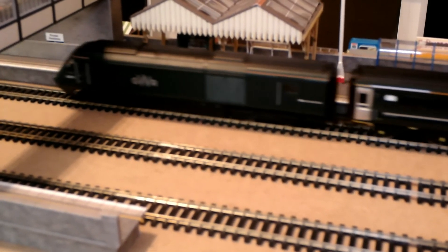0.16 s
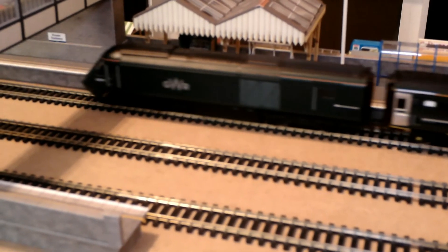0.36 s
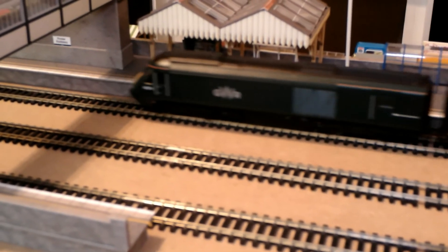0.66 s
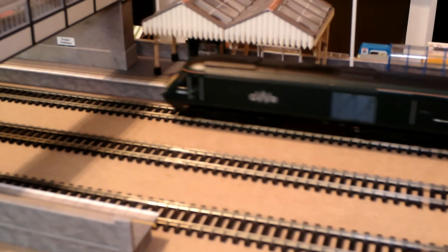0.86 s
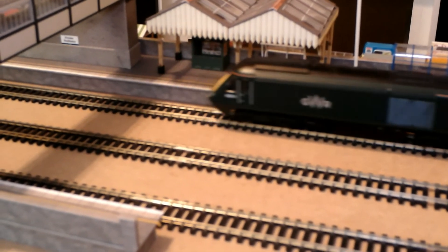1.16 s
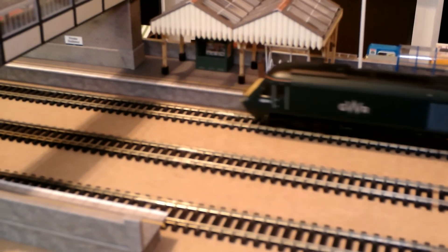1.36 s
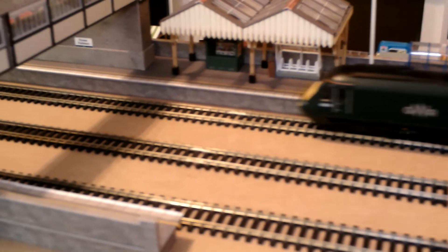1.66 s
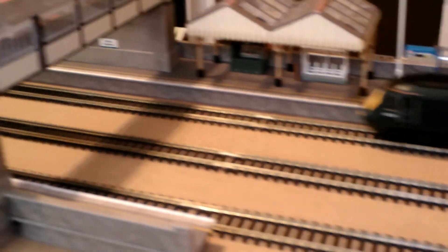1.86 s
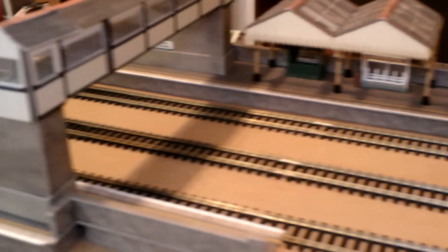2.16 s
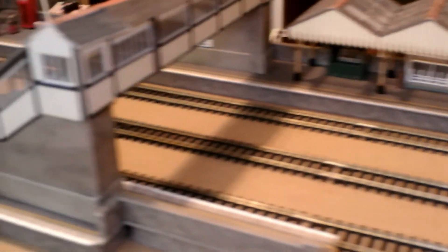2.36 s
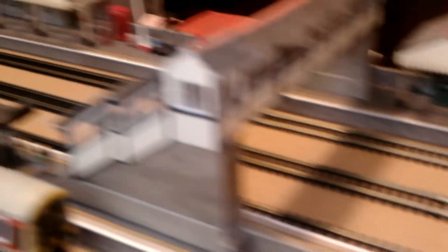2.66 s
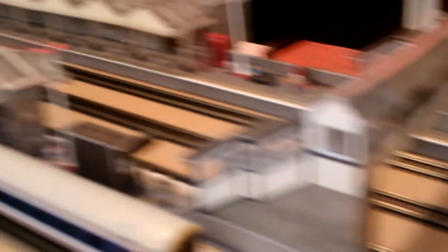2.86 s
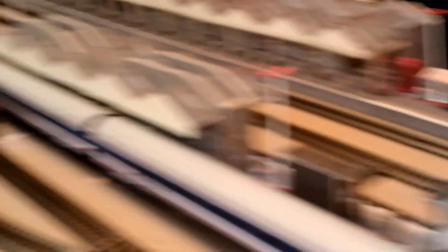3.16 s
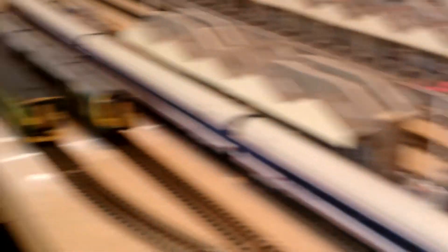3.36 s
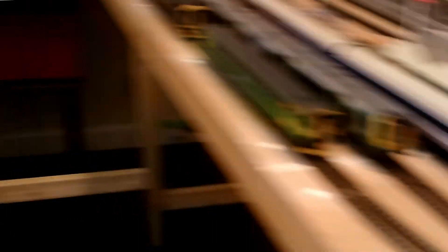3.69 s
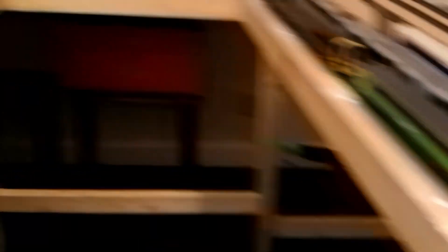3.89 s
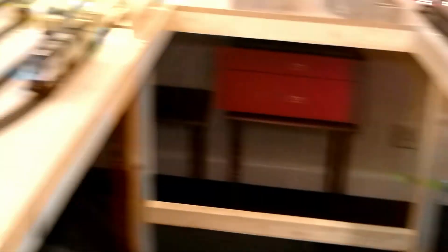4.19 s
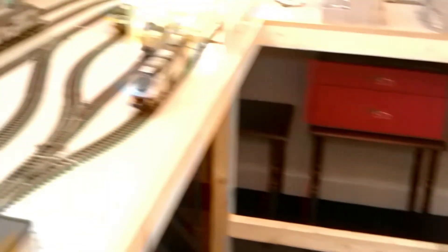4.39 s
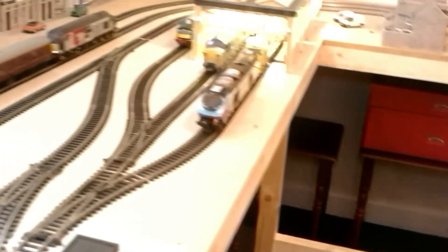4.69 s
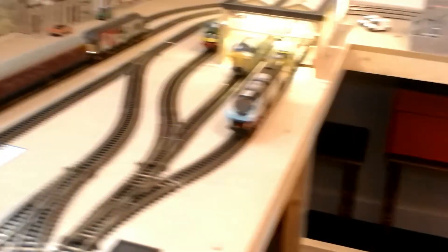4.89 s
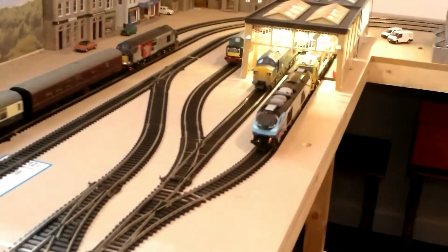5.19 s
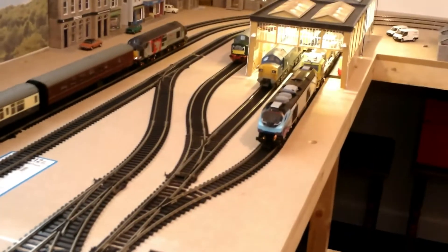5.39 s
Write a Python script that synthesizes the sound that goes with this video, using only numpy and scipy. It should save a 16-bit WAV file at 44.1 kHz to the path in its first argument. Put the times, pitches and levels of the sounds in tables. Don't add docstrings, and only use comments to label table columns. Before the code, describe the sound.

Steady rolling noise of small trains on rails, nasal and rattly with little bass, its tone shifting as vehicles pass. Small clicks tick unevenly for the first three seconds; then a fast chattering drive noise approaches and becomes a rough, pulsing clatter close to the microphone. There is thin hiss and faint whine above, soft baseboard hum below and short reflections from near walls. Mono handheld phone pickup, slightly lossy.

```python
import sys
import numpy as np
from scipy import signal
from scipy.fft import rfft, irfft, next_fast_len
from scipy.io import wavfile
from scipy.ndimage import uniform_filter1d

SR = 44100
rng = np.random.default_rng(int(sys.argv[2]) if len(sys.argv) > 2 else 0)


def field_ratio(decibels):
    return 10 ** (np.asarray(decibels, dtype=float) / 20)


def transcribe(signal):
    frames = np.atleast_2d(signal).T
    limited = np.clip(frames, -1, 1)
    pcm = np.round(limited * 32767).astype(np.int16)
    wavfile.write(sys.argv[1], SR, pcm)


N = 244439

# (time [s], lower ring level [dB], lower ring pitch [Hz], upper ring level [dB], upper ring pitch [Hz])
KNOCKS_APPROACHING = [(3.3125, -44.0, 1750, -28.0, 2260), (3.3651, -25.0, 1450, -29.0, 1840),
                      (3.4068, -31.5, 1750, -27.0, 2870), (3.4505, -32.0, 1750, -30.5, 1800),
                      (3.485, -27.5, 1750, -21.5, 2270), (3.5248, -35.0, 1150, -26.5, 2060),
                      (3.5628, -23.5, 1550, -31.0, 1890), (3.602, -31.0, 1750, -21.5, 1930),
                      (3.6351, -28.0, 1200, -22.5, 2210), (3.6798, -29.5, 1750, -22.5, 1910),
                      (3.7082, -30.5, 1750, -20.0, 2210), (3.7525, -27.0, 1750, -15.5, 2380),
                      (3.7882, -26.0, 1510, -24.5, 2410), (3.8216, -40.0, 1750, -29.0, 1850),
                      (3.8627, -24.5, 1750, -23.5, 1810), (3.8993, -33.0, 1750, -23.5, 1850),
                      (3.9343, -34.5, 1150, -23.0, 2570), (3.9718, -33.0, 1750, -21.5, 1880),
                      (4.0013, -29.0, 1160, -29.0, 1910), (4.0446, -35.5, 1750, -23.0, 2500),
                      (4.0799, -19.5, 1350, -20.5, 2240), (4.0871, -20.5, 1430, -19.0, 2230),
                      (4.0987, -23.5, 1190, -21.0, 1880), (4.1292, -33.0, 1750, -18.5, 2510),
                      (4.1559, -24.5, 1420, -16.0, 2610), (4.2011, -29.0, 1310, -27.5, 2330),
                      (4.2327, -21.5, 1370, -26.5, 2450), (4.2749, -26.0, 1340, -24.0, 1880),
                      (4.2825, -29.0, 1750, -19.5, 2240), (4.3074, -16.0, 1490, -28.0, 1860),
                      (4.3497, -27.5, 1280, -29.5, 2590), (4.3814, -18.5, 1350, -28.0, 2430),
                      (4.3949, -32.0, 1330, -20.5, 2170), (4.4241, -36.5, 1430, -23.0, 2430),
                      (4.4601, -18.0, 1430, -29.5, 2340), (4.4996, -27.0, 1430, -28.0, 2170)]
# (time [s], lower ring level [dB], lower ring pitch [Hz], upper ring level [dB], upper ring pitch [Hz])
KNOCKS_CLOSE = [(4.5377, -23.0, 1310, -25.5, 2170), (4.5806, -26.0, 1500, -26.5, 2060),
                (4.6126, -18.5, 1420, -38.5, 2130), (4.6596, -26.5, 1440, -26.0, 2360),
                (4.6938, -24.0, 1460, -27.0, 2190), (4.7318, -25.5, 1420, -27.0, 2690),
                (4.7687, -16.0, 1400, -28.0, 2700), (4.7784, -19.5, 1390, -20.5, 2180),
                (4.8099, -20.0, 1500, -33.5, 1860), (4.8438, -10.5, 1530, -16.5, 2690),
                (4.8902, -15.0, 1420, -16.5, 2690), (4.9241, -18.0, 1530, -24.0, 2630),
                (4.9691, -21.0, 1640, -19.5, 1920), (5.0013, -8.0, 1550, -16.5, 2860),
                (5.0081, -17.0, 1480, -20.0, 2190), (5.0454, -12.0, 1470, -27.0, 2030),
                (5.0599, -19.0, 1440, -31.5, 2090), (5.0818, -34.5, 1350, -19.5, 2710),
                (5.1216, -21.0, 1410, -20.5, 2700), (5.1321, -23.5, 1360, -16.0, 2680),
                (5.1602, -21.5, 1430, -18.5, 2270), (5.1689, -21.0, 1510, -19.5, 2660),
                (5.1979, -18.5, 1440, -20.5, 2300), (5.2126, -20.5, 1480, -19.0, 2460),
                (5.2312, -13.0, 1610, -21.0, 2240), (5.2374, -17.0, 1550, -21.0, 1800),
                (5.2604, -25.0, 1740, -24.0, 2100), (5.2786, -35.0, 1150, -24.5, 2470),
                (5.3125, -17.0, 1500, -17.0, 2140), (5.3246, -19.0, 1440, -23.5, 2100),
                (5.357, -19.0, 1480, -20.0, 2440), (5.3666, -24.0, 1490, -19.0, 2460),
                (5.3888, -7.5, 1510, -30.0, 2370), (5.4293, -20.5, 1490, -29.5, 1800),
                (5.4662, -15.0, 1480, -23.5, 2280), (5.5094, -19.0, 1560, -24.5, 2500),
                (5.5193, -20.5, 1730, -20.5, 1800), (5.5385, -23.0, 1540, -19.0, 2410)]
RING_LEAD_S = 0.0042


def rms_one(x):
    return x / np.sqrt(np.mean(x ** 2) + 1e-20)


def in_time(rows):
    s, *columns = np.transpose(rows)
    return [np.interp(np.arange(N) / SR, s, c) for c in columns]


def swells(rows):
    t = np.arange(N) / SR
    return sum(db * np.exp(-((t - s) / half_s) ** 2) for s, half_s, db in rows)


def drift(rate):
    r = np.exp(-80 * np.pi * rate / SR)
    slow = signal.lfilter([1], [1, -2 * r, r * r], rng.standard_normal(N // 40 + 2002))[2000:]
    return np.interp(np.arange(N) / 40, np.arange(len(slow)), rms_one(slow))


def shaped(x, gain_at):
    size = next_fast_len(N)
    hz = np.arange(1, size // 2 + 2) * SR / size
    return irfft(rfft(x, size) * gain_at(hz), size)[:N]


def coloured(points):
    hz, db = np.transpose(points)
    return rms_one(shaped(rng.standard_normal(N), lambda f: field_ratio(np.interp(np.log(f), np.log(hz), db))))


def steep(x, low_hz, high_hz):
    return signal.sosfilt(signal.butter(4, [low_hz, high_hz], "band", fs=SR, output="sos"), x)


def rush():
    # (time [s], rush level [dB], brightness as it turns toward the microphone [dB])
    train_run = [(0.0, -33, 3), (0.2, -31.5, 0.5), (0.75, -28.5, 1), (1.36, -29.5, -2.5), (2.13, -30.5, 2),
                 (2.33, -33.5, 4.5), (2.95, -30, -3), (3.78, -30.5, 0.5), (4.03, -35, 3), (4.09, -35, -2.5),
                 (4.2, -29, -3.5), (4.43, -29.5, 2), (4.61, -30.5, -3), (4.86, -27.5, 2), (4.94, -27, -1),
                 (5.15, -29, 2.5), (5.51, -30, 2), (5.54, -27, 0)]
    # (time [s], level [dB])
    far_train = [(0.0, -33), (0.48, -35), (0.52, -31.5), (0.63, -33), (2.79, -38), (2.85, -35.5),
                 (3.16, -36.5), (3.26, -34), (3.35, -39.5), (3.38, -33.5), (3.7, -34), (4.1, -33),
                 (4.2, -36), (4.4, -30), (4.41, -31.5), (5.25, -33), (5.48, -34), (5.54, -31.5)]
    # (time [s], half length [s], level [dB])
    bogie_surges = [(.40, 0.044, 4), (.55, 0.08, 3.5), (.92, 0.059, -1), (1.17, 0.035, 2.5),
                    (1.36, 0.036, 0), (1.46, 0.037, 1.5), (1.68, 0.054, -1), (2.01, 0.019, 3),
                    (2.09, 0.032, -2.5), (2.22, 0.027, 1), (2.5, 0.069, -0.5), (2.6, 0.015, 2),
                    (2.7, 0.015, -2), (2.87, 0.011, -1), (3.0, 0.037, -1.5), (3.06, 0.026, 2.5),
                    (3.13, 0.021, -2.5), (3.27, 0.023, 3.5), (3.76, 0.021, 1), (4.07, 0.09, 5.5),
                    (4.21, 0.024, -0.5), (4.71, 0.016, -8), (4.95, 0.004, 0.5), (5.32, 0.017, -1),
                    (5.365, 0.0094, 2), (5.49, 0.01, 1.5)]
    # (time [s], half length [s], panel boost [dB])
    coach_passes = [
        (0.5, 0.24, 5),
        (1.2, 0.1, 5),
        (1.898, 0.11, 7.5),
        (2.8, 0.039, 9),
        (3.12, 0.16, 6.5),
    ]
    # (pitch [Hz], width [Hz], level [dB])
    body_low = [(747, 54, -5), (885.4, 36, -2.5), (968.4, 42, -2.5), (1081, 97, -1), (1117, 63, 0.5),
                (1218, 130, -4.5)]
    # (pitch [Hz], width [Hz], level [dB])
    body_mid = [(1328, 63, -4.5), (1388, 40, 1), (1481, 19, -1), (1546, 17, -4.5), (1606, 18, -2.5),
                (1708, 38, -1), (1763, 41, -0.5), (1862, 33, 1), (1965, 59, -1), (2000, 33, -3),
                (2047, 23, -1)]
    # (pitch [Hz], width [Hz], level [dB])
    body_top = [(2210, 43, 2.5), (2241, 61, -3), (2280, 25, 2), (2373, 36, -1.5), (2437, 30, 2),
                (2578, 43, -1), (2694, 48, -2), (2745, 54, -7.5), (2813, 46, -10)]
    # (pitch [Hz], width [Hz], level [dB])
    body_edge = [(3000, 290, -0.5), (3130, 220, -0.5), (3326, 370, 3.5), (3426, 180, 1.5),
                 (3470, 130, -5.5)]

    mid_db, bright_db = in_time(train_run)
    far_db, = in_time(far_train)
    ticks = rolling(5000, spread_db=2.0) * field_ratio(0.63 * drift(11))
    far_ticks = rolling(5000, spread_db=0.5)
    shake_db = throb() + swells(bogie_surges)
    low_db = far_db + 0.4 + 0.4 * shake_db
    top_db = mid_db - 2.5 + bright_db + shake_db
    edge_db = mid_db - 16 + bright_db + swells(coach_passes) + shake_db
    low = field_ratio(low_db) * rms_one(resonate(far_ticks, body_low, patchy_db=1.27, rate=5.0))
    mid = field_ratio(mid_db - 1.03 + shake_db) * rms_one(resonate(ticks, body_mid, patchy_db=1.5, rate=7.3))
    top = field_ratio(top_db) * rms_one(resonate(ticks, body_top, patchy_db=1.5, rate=2.8))
    panels = steep(resonate(ticks, body_edge, patchy_db=0.7, rate=1.9), 2796, 3800)
    return steep(mid - low - top, 640, 3110) - field_ratio(edge_db) * rms_one(panels)


def rolling(per_s, spread_db):
    sizes = field_ratio(spread_db * np.minimum(rng.exponential(1, N), 5)) * rng.choice([-1, 1], N)
    return sizes * (rng.random(N) < per_s / SR) + 1e-18


def resonate(x, modes, patchy_db, rate):
    wander, wander_per_s = 0.003, 1.0
    out = 0
    for k, (hz, width, db) in enumerate(modes):
        turn = np.exp(2j * np.pi * np.cumsum(hz * (1 + wander * drift(wander_per_s))) / SR)
        ring = (turn * signal.lfilter([1], [1, -np.exp(-np.pi * width / SR)], x / turn)).real
        level_db = db + passing(hz) + patchy_db * drift(rate)
        out = out + (-1) ** k * field_ratio(level_db) * rms_one(ring)
    return out


def passing(hz):
    # (time [s], cancelled pitch [Hz], depth [dB])
    board_echo = [(1.0, 1122, 2.5), (1.3, 1146, -0.5), (1.75, 1240, 10), (2.2, 1434, -4), (2.45, 1596, 0.5),
                  (3.3, 1347, 9.5), (3.6, 1320, 0.5), (4.05, 1685, 13.5), (4.7, 1735, 3), (5.4, 1917, 13),
                  (5.54, 1840, 8.5)]
    # (time [s], half
    # length [s], shell pitch [Hz], level [dB])
    singing_shells = [(.43, 0.38, 1940, 3.5), (.48, 0.58, 2257, -1.5), (0.744, 0.16, 2340, -3),
                      (0.11, 0.36, 1294, 5.5), (1.065, 0.22, 1464, 8), (2.215, 0.045, 2204, 7),
                      (2.242, 0.14, 2430, 0), (3.307, 0.28, 1417, 4.5), (1.225, 0.13, 2636, 12.5),
                      (1.274, 0.58, 1800, 6.5), (1.535, 0.31, 2260, 9), (1.854, 0.26, 1915, 5),
                      (1.88, 0.6, 886, 2.5), (2.103, 0.18, 2694, 8), (2.257, 0.32, 1736, 9),
                      (2.692, 0.42, 2367, -1), (2.733, 0.25, 1430, 8.5), (2.953, 0.25, 1098, 6.5),
                      (3.306, 0.99, 1008, 4.5), (3.45, 0.13, 2800, 20.5), (3.745, 0.11, 2340, 5.5),
                      (3.924, 0.26, 1924, 5), (4.158, 0.073, 2643, 22.5), (4.828, .4, 2639, 8),
                      (5.034, 0.15, 2910, 19.5), (5.274, .03, 1370, -12), (5.09, 0.057, 1404, -5.5),
                      (4.961, 0.037, 1426, -4.5), (5.318, 0.035, 1520, 7.5), (5.422, 0.045, 1474, 6),
                      (5.364, 0.027, 2500, -0.5), (0.234, .15, 1885, 3.5), (.4, 0.034, 2450, 7),
                      (.8, .05, 2340, 4), (1.0, 0.065, 2450, 3.5), (1.425, 0.1, 2280, 3.5),
                      (3.1, 0.15, 2470, 5), (3.056, .04, 1470, 3), (3.34, 0.041, 1422, 5.5),
                      (3.502, .08, 946, 1.5), (3.978, 0.056, 927, 4.5), (4.352, .06, 988, 4),
                      (1.115, .06, 970, 5.5)]
    echo_width_hz, shell_width_hz = 57, 65

    t = np.arange(N) / SR
    notch_hz, depth_db = in_time(board_echo)
    cancelled = np.exp(-((hz - notch_hz) / echo_width_hz) ** 2)
    lifted = np.exp(-((hz - 0.73 * notch_hz) / echo_width_hz) ** 2)
    out = depth_db * (0.52 * lifted - cancelled)
    for s, half_s, shell_hz, db in singing_shells:
        if abs(hz - shell_hz) < 3 * shell_width_hz:
            out += db * np.exp(-((hz - shell_hz) / shell_width_hz) ** 2 - ((t - s) / half_s) ** 2)
    return out


def throb():
    # (time [s], throb depth [dB])
    throb_depth = [
        (3.3, 0),
        (3.8, 5),
        (4.7, 5),
        (4.85, 9),
        (5.54, 8),
    ]
    shake_s = 0.013

    since = np.arange(N) / SR + RING_LEAD_S - np.array(KNOCKS_APPROACHING + KNOCKS_CLOSE)[:, :1]
    since = np.where(since > 0, since, np.inf).min(axis=0).clip(max=1) / shake_s
    shake = uniform_filter1d(since * np.exp(1 - since), size=200)
    return in_time(throb_depth)[0] * (shake - 0.45)


def knocks():
    ring_s, ring_tail_s, ring_tail = 0.0042, 0.016, 0.2
    rattle_s, rattle_tail_s, rattle_tail = 0.0065, 0.017, 0.15
    rattle_db, upper_lag_s = -16, 0.001

    def swell(u):
        tail = np.exp(-u / ring_tail_s) * (1 - np.exp(-(u / ring_s) ** 2))
        return (u / ring_s * np.exp(1 - u / ring_s)) ** 3 + ring_tail * tail

    t = np.arange(int(0.06 * SR)) / SR
    lower_shape, upper_shape = swell(t), swell((t - upper_lag_s).clip(0))
    rattle_shape = (t / rattle_s) ** 2 * np.exp(2 - 2 * t / rattle_s)
    rattle_shape += rattle_tail * np.exp(-t / rattle_tail_s) * (1 - np.exp(-t / ring_s))
    noise = rng.standard_normal((3, N + len(t)))
    body = rms_one(steep(noise[1], 1120, 2800) + field_ratio(-1.0) * steep(noise[0], 665, 1294))
    edge = rms_one(steep(noise[2], 2900, 3628) + field_ratio(-11.5) * steep(noise[0], 3500, 4230))
    out = np.zeros(N + len(t))
    for s, low_db, low_hz, high_db, high_hz, edge_db in knock_list():
        at = round((s - RING_LEAD_S) * SR)
        span = slice(at, at + len(t))
        lower = field_ratio(low_db) * lower_shape * np.sin(2 * np.pi * low_hz * t)
        upper = field_ratio(high_db) * upper_shape * np.sin(2 * np.pi * high_hz * t)
        rattle = field_ratio(rattle_db) * body[span] + field_ratio(edge_db - 9.0) * edge[span]
        strength = np.hypot(field_ratio(low_db), field_ratio(high_db))
        out[span] += field_ratio(1.5) * (lower + upper + strength * rattle_shape * rattle)
    return out[:N]


def knock_list():
    # (time [s], lower ring level [dB], lower ring pitch [Hz], upper ring level [dB], upper ring pitch [Hz])
    rail_joints = [(0.1708, -25.5, 1344, -26, 1930), (0.2596, -37, 1780, -18, 1830),
                   (0.289, -19, 1680, -29.5, 1980), (0.3954, -50, 1750, -19, 1900),
                   (0.473, -32.5, 1700, -24, 2400), (0.5336, -35.5, 1750, -23, 1893),
                   (0.5859, -24.5, 1437, -21, 1915), (0.6724, -17, 1675, -31, 1814),
                   (0.6889, -24, 1560, -24.5, 2430), (0.729, -39, 1640, -28, 2520),
                   (0.81, -21, 1740, -24, 2450), (0.9999, -36, 1506, -27, 2450),
                   (1.0527, -38, 1780, -18.5, 1875), (1.1408, -21.5, 1750, -25, 1890),
                   (1.169, -24.5, 1760, -21.5, 1930), (1.2628, -25.5, 1784, -25, 1840),
                   (1.3617, -48, 1670, -22, 1860), (1.414, -38, 1755, -26, 1816),
                   (1.4798, -21, 1465, -35, 2200), (1.5671, -31.5, 1445, -23, 2180),
                   (1.596, -46, 1800, -24, 1910), (1.7397, -40, 1700, -22.5, 2130),
                   (1.784, -31.5, 1770, -22, 1925), (1.8332, -26, 1720, -21, 2290),
                   (2.0686, -36, 1660, -18.5, 1810), (2.1726, -36, 1600, -21, 2120),
                   (2.2552, -21.5, 1730, -25, 1850), (2.431, -32, 1290, -26, 2380),
                   (2.544, -26, 1644, -31.5, 1860), (2.6008, -29, 1400, -25.5, 2034),
                   (2.7433, -24.5, 1724, -33, 1790), (2.7788, -24.5, 1366, -40, 1910),
                   (2.822, -26, 1410, -35.5, 2280), (2.8588, -19.5, 1520, -27.5, 1850),
                   (2.8792, -26.5, 1385, -30, 1830), (2.9296, -29.5, 1430, -28.5, 1840),
                   (3.0429, -23, 1450, -25.5, 2010), (3.2584, -29, 1443, -29.5, 2200),
                   (3.2828, -27.5, 1360, -26.0, 1850)]
    # (time [s], panel edge vs rings [dB])
    mic_facing = [
        (2.9, -20.5),
        (3.2, -15),
        (3.5, -11),
        (3.75, -7.5),
        (4.27, -8),
        (4.34, -14.5),
        (4.749, -15),
        (5.54, -17),
    ]

    rows = np.array(KNOCKS_APPROACHING + KNOCKS_CLOSE + rail_joints)
    scatter_db = 1.5 * rng.standard_normal(len(rows))
    edge_db = np.interp(rows[:, 0], *np.transpose(mic_facing)) + scatter_db
    return np.column_stack([rows, edge_db])


def wall_echoes(hits):
    t = np.arange(SR // 8) / SR
    tail = rng.standard_normal(len(t)) * np.exp(-t / 0.035)
    return field_ratio(-42) * signal.fftconvolve(hits, tail)[:N]


def whine():
    # (pitch [Hz], level per Hz [dB])
    rail_hiss = [(3300, -6), (3700, -1), (4250, -6), (5600, -6.5), (7250, -7), (7700, -14.5), (9300, -15.5),
                 (9800, -22), (12000, -28.5), (14900, -30), (15700, -43)]
    # (pitch [Hz], width [Hz], level [dB])
    motor_modes = [(4680, 190, -3.5), (6530, 770, -4.5), (9000, 120, -14.5)]
    # (pitch [Hz], width [Hz], level [dB])
    ridge_modes = [(6100, 60, -3), (6155, 45, 1), (6290, 130, -7)]
    # (time [s], whine ridge level [dB])
    motor_nearness = [(0.0, -52), (0.11, -67), (0.37, -54.5), (2.92, -62), (3.78, -49), (4.04, -57),
                      (4.77, -64.5), (4.78, -53.5), (5.54, -56)]
    # (time [s], half length [s], level [dB])
    hiss_dips = [
        (2.55, 0.33, -1.5),
        (3.95, 0.092, -2.5),
        (4.6, 0.27, -2),
    ]

    motor = resonate(rng.standard_normal(N), motor_modes, patchy_db=0.0, rate=6.9)
    motor = field_ratio(-10.0) * steep(motor, 4000, 8300)
    hiss_db = -45.5 + drift(20.0) + 0.35 * throb() + swells(hiss_dips)
    ridge = resonate(rng.standard_normal(N), ridge_modes, patchy_db=2.5, rate=13.0)
    ridge = rms_one(steep(ridge, 5900, 6500))
    ridge_db = in_time(motor_nearness)[0] + 1.3
    return field_ratio(hiss_db) * rms_one(coloured(rail_hiss) + motor) + field_ratio(ridge_db) * ridge


def room():
    # (pitch [Hz], level per Hz [dB])
    room_rumble = [(15, -38.5), (25, -29.5), (65, -19.5), (130, -1.5), (174, -25), (205, -12.5),
                   (275, -7.5), (545, -5.5), (700, 0), (910, -42.5), (1540, -120)]
    # (pitch [Hz], width [Hz], level [dB])
    board_modes = [(135.8, 20, 0.49), (151.7, 15, 0.22), (202.2, 8.5, 1.2)]
    # (time [s], level [dB])
    board_load = [(0.0, -55.5), (0.52, -50), (1.87, -51.5), (1.9, -42), (1.94, -54), (2.19, -50.5),
                  (3.38, -53.5), (3.61, -47.5), (3.69, -61), (3.72, -47), (4.57, -51.5), (4.6, -46.5),
                  (5.12, -54), (5.17, -45.5), (5.51, -54.5), (5.54, -69.5)]

    hum = resonate(rng.standard_normal(N), board_modes, patchy_db=2.5, rate=4.2)
    hum_db = in_time(board_load)[0] - 0.5
    return field_ratio(-46.0) * coloured(room_rumble) + field_ratio(hum_db) * rms_one(steep(hum, 82, 400))


def scene():
    hits = knocks()
    return (rush() + hits + wall_echoes(hits) + whine() + room())[None]


def phone_thinning(x):
    # (pitch [Hz], step [dB])
    step_curve = [(150, -14), (600, -12), (3500, -11), (5000, -3), (7300, 0), (7900, 7), (8600, 2),
                  (9400, 2.5), (9900, 7.5), (10600, 3.5), (13000, 3.5), (15100, 4), (15600, 9)]
    starved_frames = [(23, 1), (40, 0), (44, 0), (49, 1), (63, 0), (84, 1), (87, 0), (88, 0), (168, 1),
                      (172, 1), (191, 0), (214, 0), (215, 0), (240, 0)]
    hop = round(1024 / 48000 * SR)
    wander_db, follows_loudness = 2.2, 0.22

    n, k = np.arange(2 * hop), np.arange(hop)
    window = np.sin(np.pi * (n + 0.5) / (2 * hop))
    basis = window * np.cos(np.pi / hop * (n + 0.5 + hop / 2) * (k[:, None] + 0.5)) * np.sqrt(2 / hop)
    count = N // hop + 3
    padded = np.pad(x, (hop + hop // 2, count * hop))
    lines = padded[np.arange(count)[:, None] * hop + n] @ basis.T
    hz = (k + 0.5) * SR / (2 * hop)

    power = lines ** 2
    usual = np.sqrt(uniform_filter1d(np.mean(power, axis=0), size=25))
    loud = np.sqrt(uniform_filter1d(np.mean(power, axis=1), size=5) / np.mean(power) + 0.00036)
    chance = uniform_filter1d(rng.standard_normal((count, hop // 12 + 1)), size=4, axis=0) * 2
    curve_hz, curve_db = np.transpose(step_curve)
    step_db = np.interp(np.log(hz), np.log(curve_hz), curve_db) + wander_db * chance[:, k // 12]
    step = usual * field_ratio(step_db) * loud[:, None] ** follows_loudness + 1e-12
    lines = np.sign(lines) * np.floor(abs(lines) / step + 0.22) * step

    quiet = (hz > 3750) | (hz > 290) & (hz < 600)
    ridge = (hz > 5950) & (hz < 6500)
    for frame, keeps_whine in starved_frames:
        lines[frame + 1] *= ~quiet | ridge & bool(keeps_whine)
    halves = (lines @ basis).reshape(count, 2, hop)
    out = np.zeros((count + 1, hop))
    out[:-1] += halves[:, 0]
    out[1:] += halves[:, 1]
    return out.ravel()[hop + hop // 2:][:N]


def band_limit(x):
    return signal.sosfilt(signal.butter(12, 15720, fs=SR, output="sos"), x)


def record(dry):
    mix = phone_thinning(dry[0])[None]
    return band_limit(mix)


dry = scene()
out = record(dry)
transcribe(out)
```